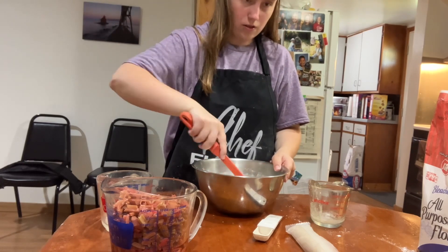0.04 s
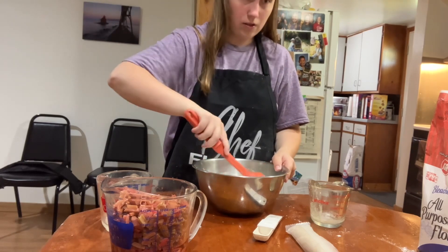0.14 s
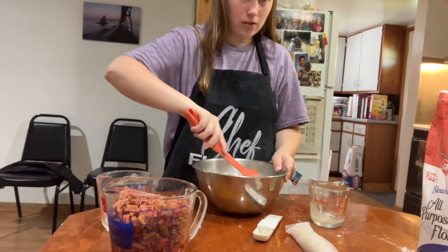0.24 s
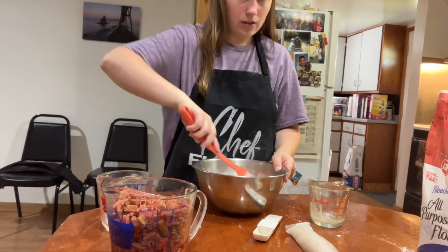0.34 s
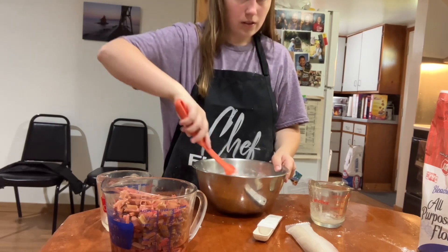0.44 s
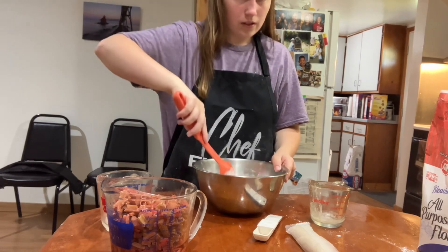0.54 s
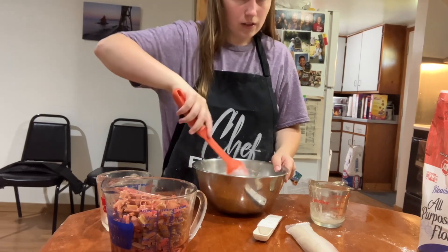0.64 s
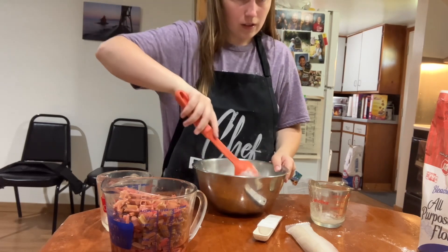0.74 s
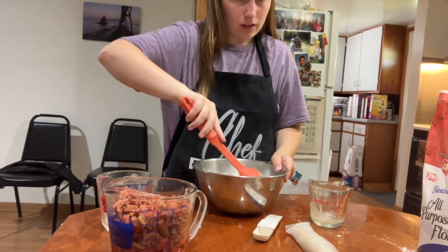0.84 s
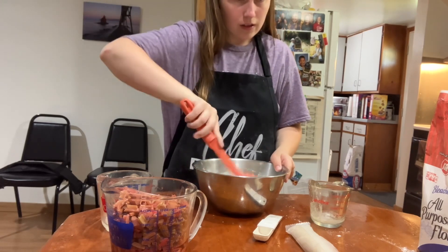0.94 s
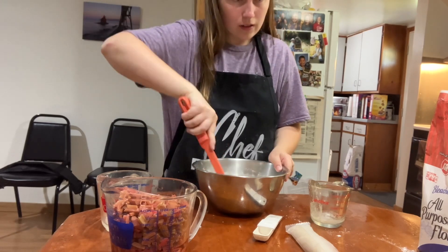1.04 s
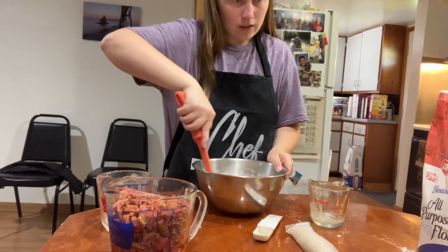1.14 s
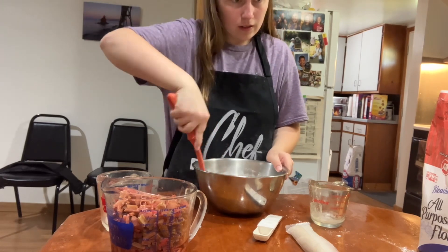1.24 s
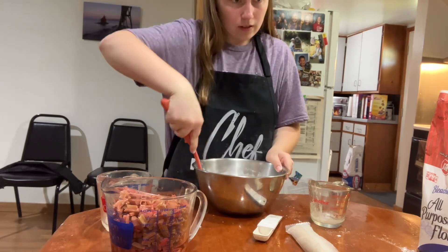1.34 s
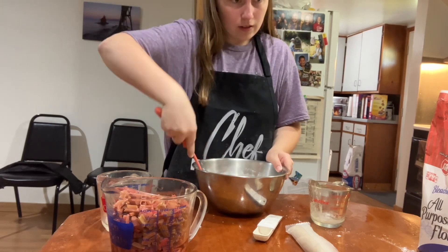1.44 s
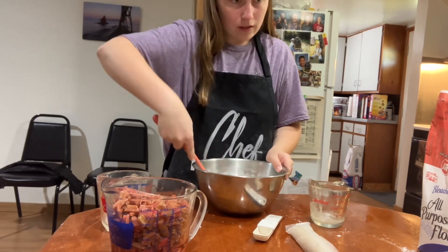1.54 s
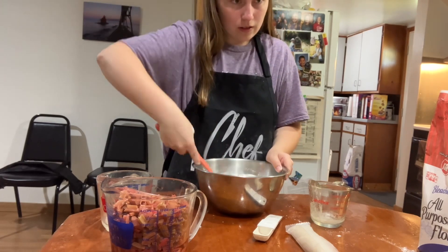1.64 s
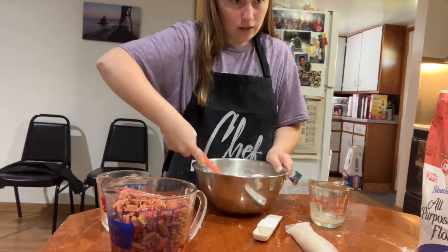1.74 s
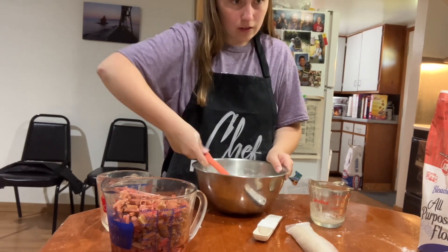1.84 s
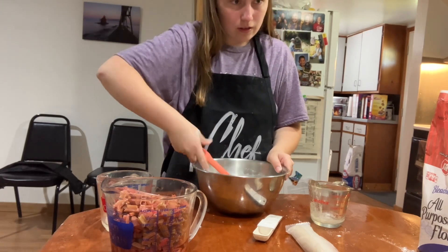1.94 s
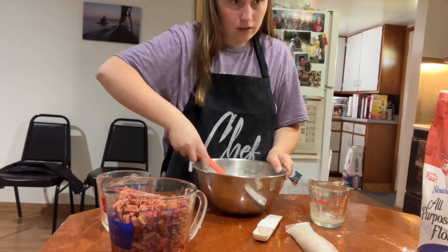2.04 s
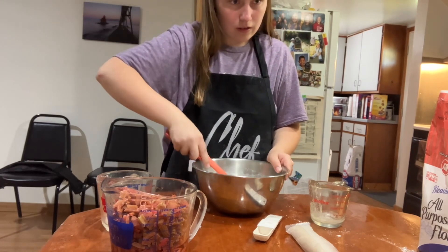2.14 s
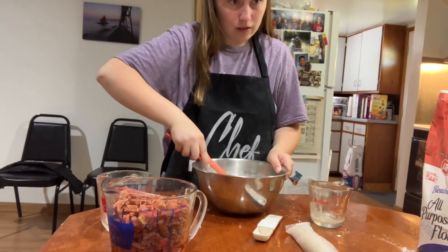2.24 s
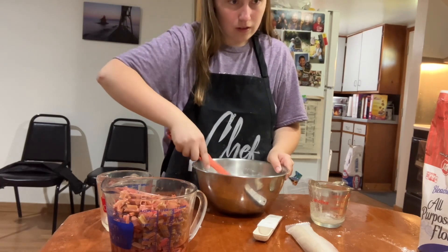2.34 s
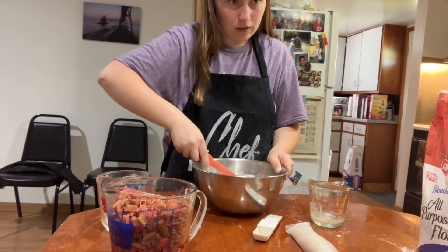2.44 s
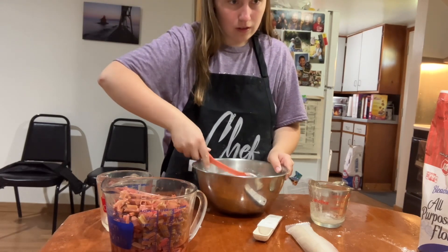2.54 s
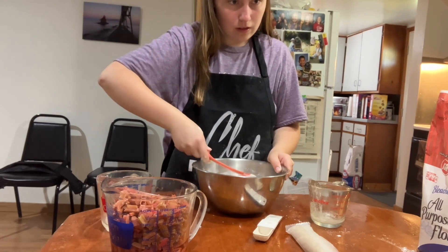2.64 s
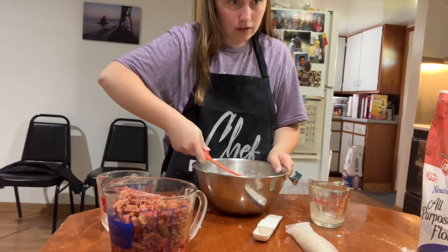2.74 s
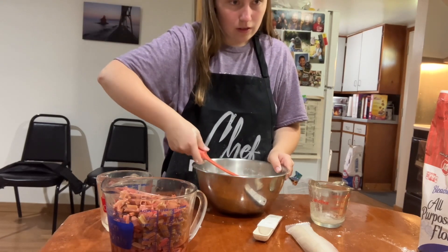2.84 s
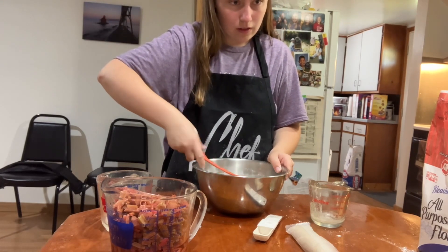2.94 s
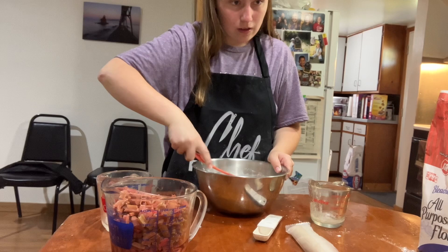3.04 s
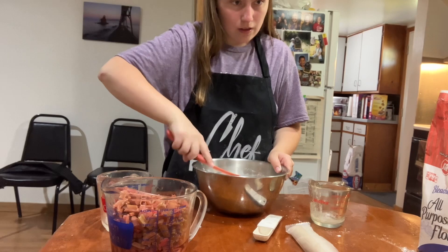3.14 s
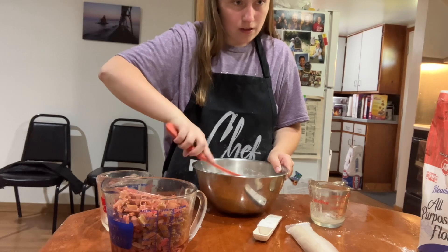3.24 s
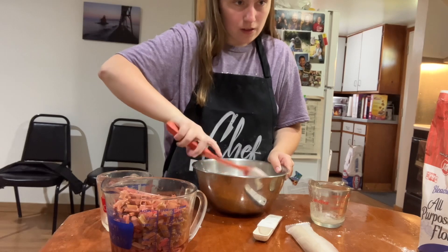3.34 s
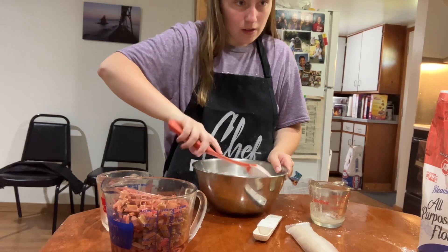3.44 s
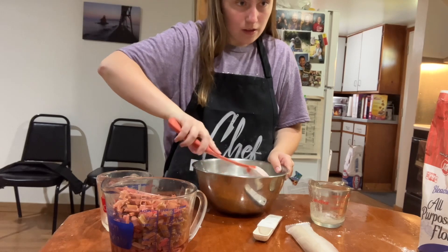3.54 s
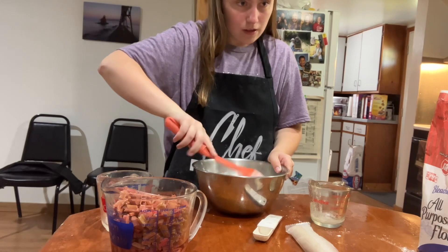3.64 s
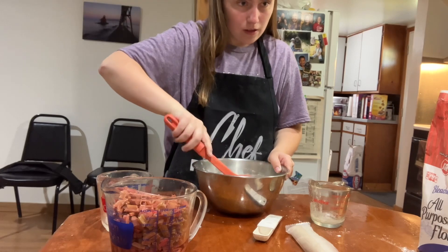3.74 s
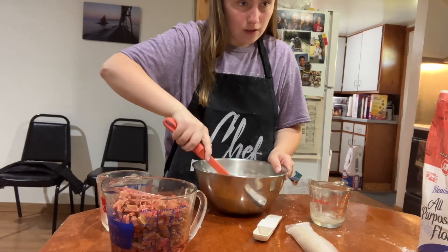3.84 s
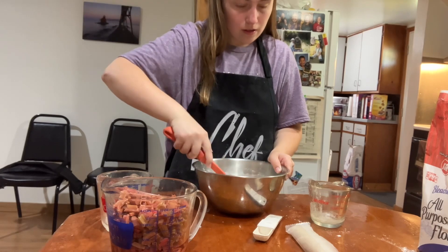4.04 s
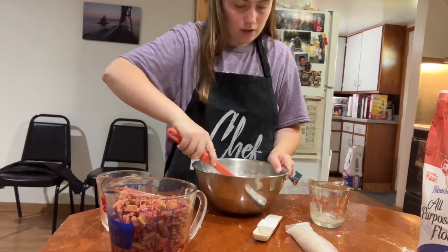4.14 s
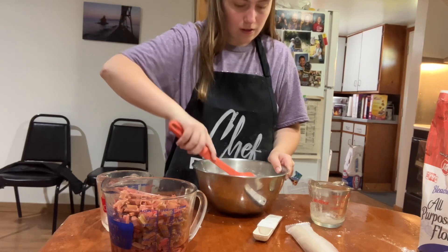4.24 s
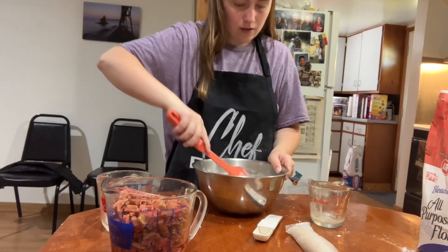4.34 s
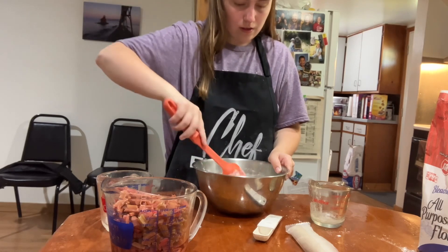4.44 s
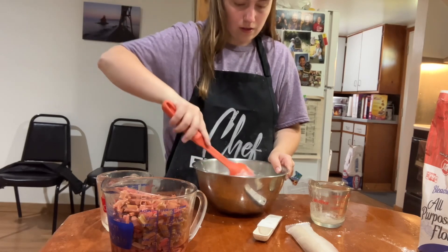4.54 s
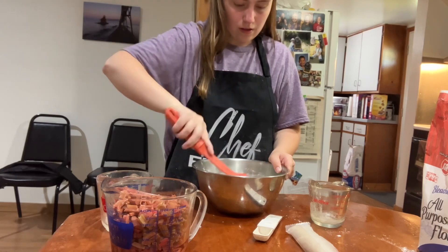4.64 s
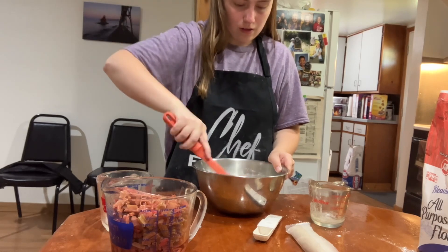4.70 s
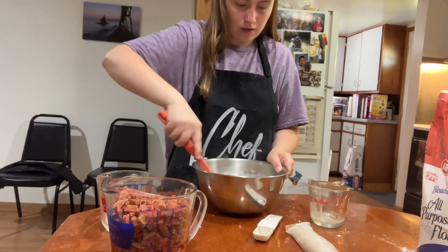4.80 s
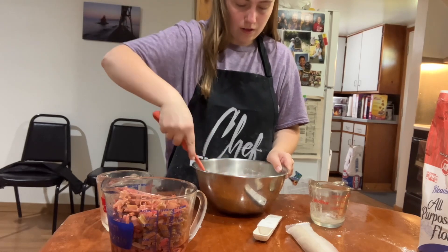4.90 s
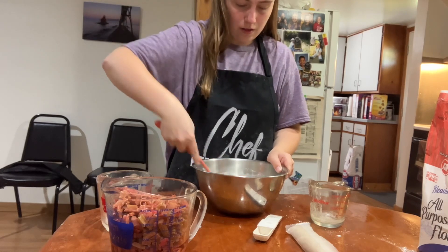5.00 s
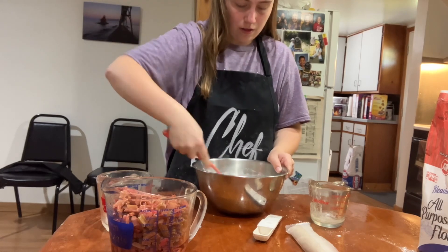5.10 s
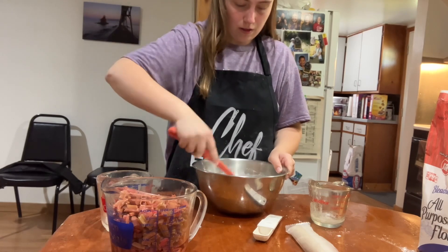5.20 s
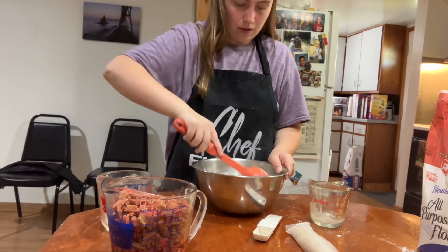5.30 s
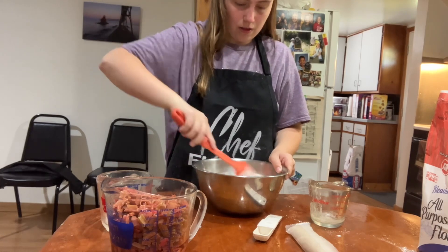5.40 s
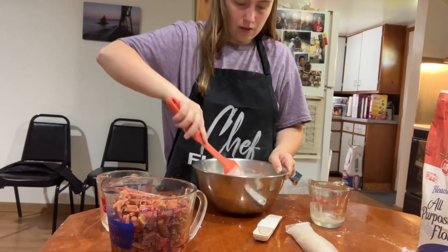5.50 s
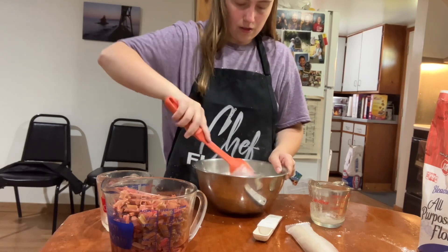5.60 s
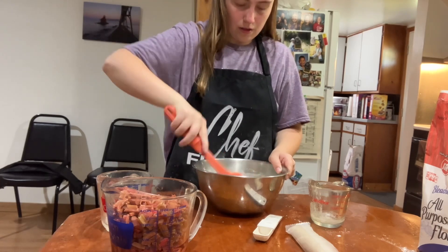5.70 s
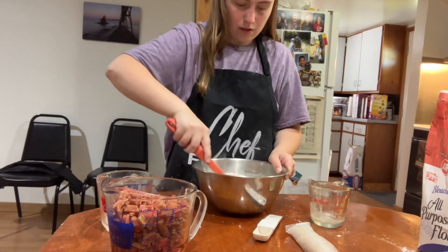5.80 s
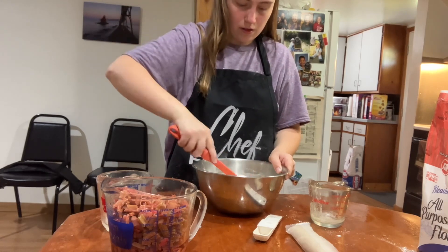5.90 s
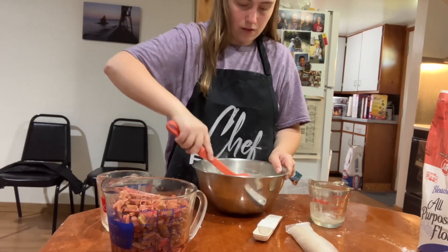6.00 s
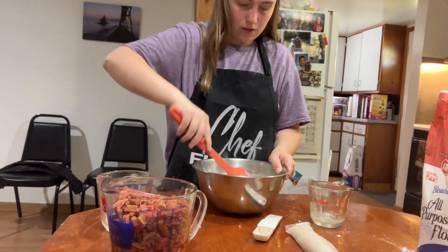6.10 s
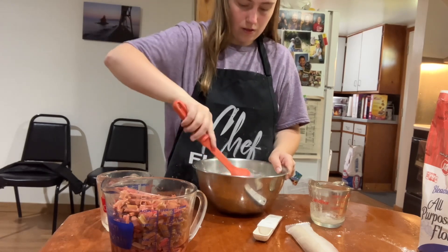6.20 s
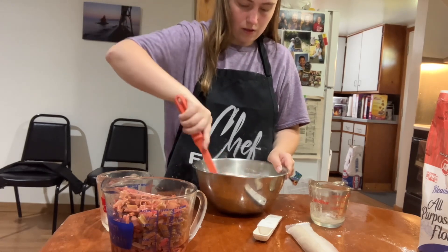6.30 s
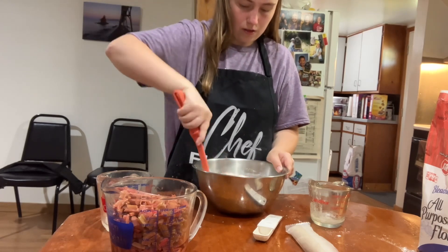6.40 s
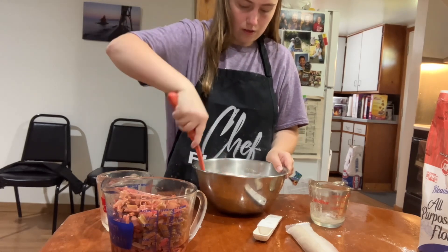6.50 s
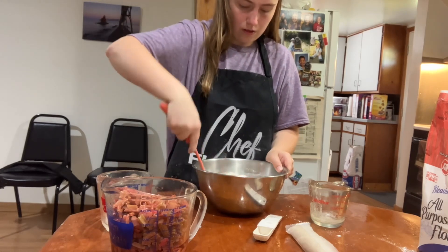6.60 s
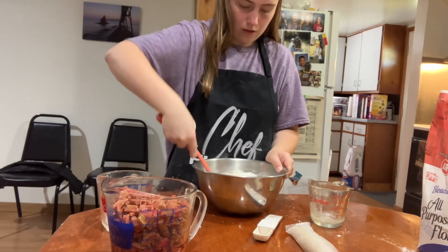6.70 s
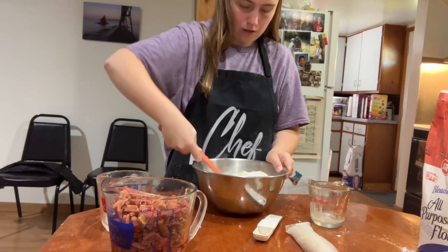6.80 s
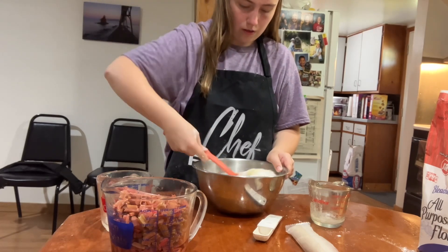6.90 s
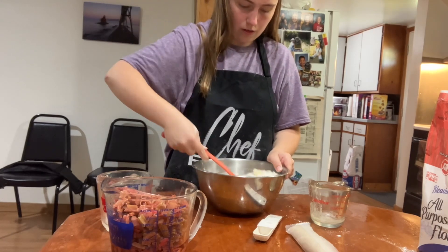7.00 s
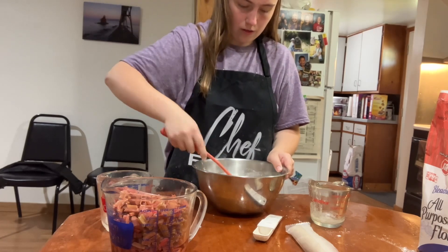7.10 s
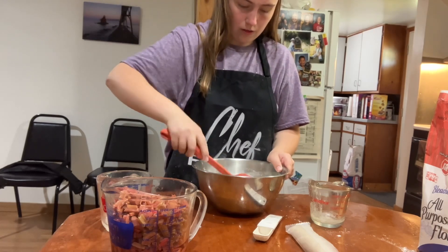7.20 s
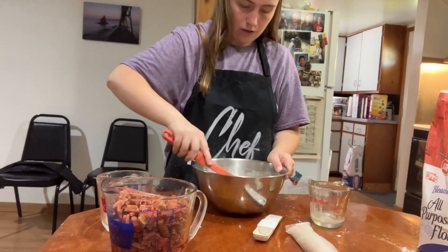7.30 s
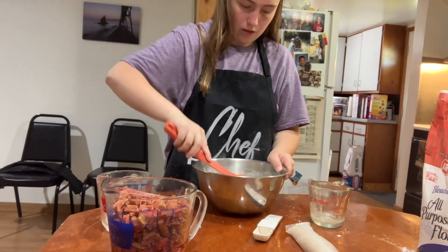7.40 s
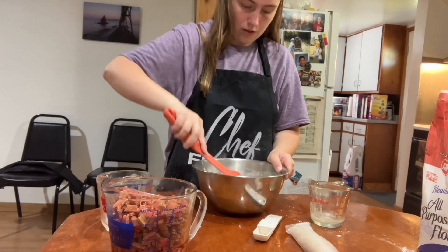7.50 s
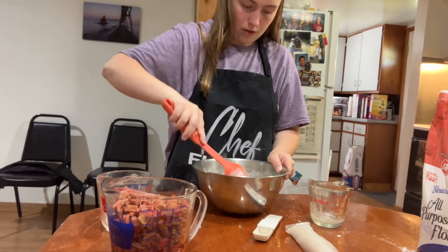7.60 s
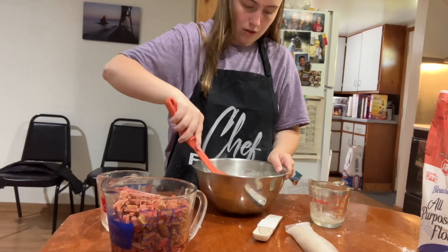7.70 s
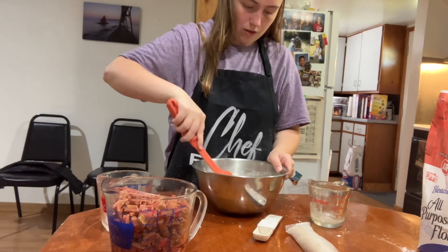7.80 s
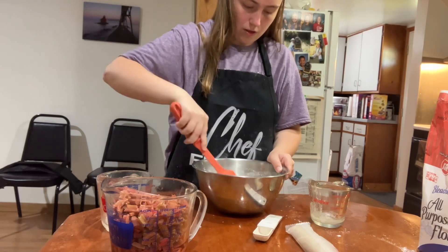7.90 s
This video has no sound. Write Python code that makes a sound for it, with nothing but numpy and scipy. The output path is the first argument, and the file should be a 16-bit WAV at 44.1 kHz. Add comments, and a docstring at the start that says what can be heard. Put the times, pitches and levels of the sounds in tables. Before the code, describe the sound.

A spatula scrapes a thick mix around a steel bowl from the start, heard from nearby in a kitchen with a slight echo. The strokes are gritty and uneven, dotted with knocks on the bowl's wall. Each knock rings only briefly, damped by the mix, and thumps the table a little. A very faint falling squeak comes at about 0.7 seconds. Busy scraping and knocking run from 0.9 to 2 seconds, then thin out and almost stop near 3 seconds. The stirring picks up at 3.6 seconds with more scrapes and clacks. The two hardest knocks land in quick succession near 5.7 seconds, and another ringing one follows at 6.3. The strokes ease off around 7 seconds, before a last knock and scrape at about 7.7. A low, slightly wavering appliance hum continues underneath throughout.

```python
"""A spatula scrapes a thick mix round a steel bowl, while kitchen appliances hum throughout.
From the start, grit under the blade and knocks on the wall ring the bowl, and the mix damps it.
Each knock also thumps the table. A faint squeak comes at 0.65 s. Near 3 s the stirring almost stops,
then picks up at 3.6 s, and the two hardest knocks land near 5.7 s. It eases off again around 7 s,
and one last knock and scrape come just before the end, at about 8 s."""
import sys
import numpy as np
from scipy import signal
from scipy.fft import rfft, irfft, next_fast_len
from scipy.io import wavfile
from scipy.ndimage import uniform_filter1d

SR = 44100
rng = np.random.default_rng(int(sys.argv[2]) if len(sys.argv) > 2 else 0)


def pcm_store(signal):
    """Save signal as 16-bit PCM."""
    levels = np.round(np.clip(np.atleast_2d(signal), -1, 1) * 32767)
    wavfile.write(sys.argv[1], SR, levels.astype(np.int16).T)


N = 350595

# One list of points per stroke. Sliding sets the hiss, pressing sets the boom: time_s, slide_db, press_db
STROKES = [
    [(0.0, -41.5, -43), (0.02, -49, -56), (0.03, -53, -48.5), (0.082, -55.5, -59), (0.1, -61, -54)],
    [(0.1, -53, -53), (0.184, -46.5, -46), (0.348, -55, -51.5), (0.43, -68.5, -73), (0.564, -86, -76),
     (0.6, -91, -88)],
    [(0.885, -58, -51), (0.909, -57, -62), (0.933, -53, -65), (0.943, -41.5, -48), (0.959, -43.5, -43),
     (0.97, -48, -53)],
    [(0.97, -49.5, -55), (1.062, -57.5, -48.5), (1.174, -54.5, -54), (1.232, -53, -49),
     (1.482, -66.5, -68.5), (1.5, -73, -76)],
    [(1.5, -70, -62), (1.606, -52, -43.5), (1.666, -60, -54.5), (1.702, -52, -46.5), (1.814, -57.5, -61),
     (1.82, -57.5, -40.5)],
    [(1.84, -52, -70), (1.844, -59.5, -64), (1.936, -71, -67), (2.036, -75.5, -66), (2.142, -102, -79),
     (2.2, -93, -78)],
    [(2.3, -99, -67), (2.316, -69.5, -56), (2.522, -75.5, -72.5), (2.558, -88, -89), (2.576, -90, -85),
     (2.6, -95, -65)],
    [(2.6, -87, -61), (2.648, -83, -77), (2.656, -78, -61), (2.712, -70, -53.5), (2.824, -100, -80),
     (2.85, -101, -83)],
    [(3.14, -90, -84), (3.174, -86, -88), (3.218, -84, -77), (3.236, -87, -79), (3.282, -102, -76),
     (3.3, -99, -91)],
    [(3.625, -64, -68), (3.669, -65, -74), (3.737, -72, -80), (3.743, -65.5, -76), (3.807, -77, -73),
     (3.84, -70, -68)],
    [(3.84, -67.5, -69), (3.9, -55.5, -44.5), (3.91, -57, -51), (3.92, -52, -48), (3.934, -62, -55),
     (3.98, -66, -57)],
    [(3.98, -63, -55), (4.0, -62.5, -46.5), (4.044, -56.5, -54), (4.052, -48.5, -58), (4.088, -58, -43),
     (4.1, -69, -60)],
    [(4.1, -62, -56), (4.106, -56.5, -54.5), (4.282, -68, -65.5), (4.31, -73, -78), (4.356, -79, -68),
     (4.5, -102, -89)],
    [(4.652, -48.5, -42.5), (4.696, -53, -51.5), (4.74, -48, -42.5), (4.764, -56.5, -51),
     (4.774, -59.5, -46.5), (4.88, -70.5, -62)],
    [(4.88, -71.5, -64), (4.968, -46.5, -53), (5.09, -54, -48.5), (5.198, -66.5, -65.5),
     (5.218, -73.5, -49), (5.25, -66, -85)],
    [(5.268, -50, -68), (5.272, -56, -54), (5.306, -49.5, -54), (5.328, -58, -60), (5.516, -73.5, -90),
     (5.62, -103, -86)],
    [(5.728, -54, -30.5), (5.734, -47, -56), (5.756, -54, -69), (5.762, -52, -34)],
    [(5.782, -55, -34), (5.79, -56, -52), (5.806, -57, -48), (5.838, -55, -38), (5.858, -53, -53),
     (5.905, -65, -44)],
    [(5.93, -57, -43), (5.946, -74, -47), (5.968, -62, -54), (6.022, -69, -62), (6.19, -95, -74),
     (6.25, -85, -78)],
    [(6.303, -55, -50), (6.311, -51.5, -40.5), (6.351, -57, -51), (6.367, -52.5, -44.5),
     (6.463, -51.5, -54), (6.51, -64, -75)],
    [(6.51, -58, -56), (6.6, -50.5, -39), (6.808, -54.5, -53), (6.83, -55.5, -50), (6.86, -58, -73),
     (6.9, -65, -61)],
    [(6.9, -64.5, -63.5), (7.044, -68.5, -71), (7.11, -65, -73), (7.172, -72, -96), (7.198, -74, -68),
     (7.25, -84, -75)],
    [(7.29, -72, -66), (7.3, -66.5, -59), (7.344, -76, -72), (7.372, -84, -88), (7.384, -90, -68),
     (7.45, -91, -69)],
    [(7.683, -68.5, -65), (7.705, -77, -67), (7.71, -60, -57)],
    [(7.722, -50, -47), (7.744, -60, -53), (7.838, -59, -52), (7.854, -61.5, -58), (7.924, -71.5, -50.5),
     (7.95, -58, -61)],
]
# The tone of each stroke:
# low_ring_db, high_ring_db, top_hiss_db, rasp_start_hz, rasp_end_hz, extra_rasp_db
STROKE_TONES = [(-3, -5.5, -7, 3800, 1750, 3), (-12, -11.5, -12, 1800, 1300, 0.5),
                (-14, -3, -14, 4700, 790, 0), (-7.5, -2.5, -9.5, 2140, 1270, 1),
                (-2.5, -5.5, -3, 2130, 1600, 5.5), (2, -4, -5.5, 2000, 1100, 2),
                (0.5, -6.5, 0.5, 2000, 1450, 5), (1, 1.5, -9, 4200, 6500, 1),
                (-17, -14, 4, 1500, 1470, 0.1), (-6, -3.5, -9, 980, 900, -1),
                (-5, -2.5, -4.5, 2200, 2100, -0.5), (-3.5, -1, -1, 1800, 1500, -1.5),
                (-8.5, -7.5, -1.5, 1620, 1500, 7.5), (-17, -3, -7, 1960, 2000, 3),
                (4.5, 1, -8, 3300, 1230, 4), (-19.5, -12.5, -9, 1400, 1600, 3),
                (6, 0.5, -17, 2700, 2700, 5), (-4, -1, -12, 2000, 2300, 6.5), (4, -2, -6, 1700, 1300, -4.5),
                (0.5, -0.5, -3.5, 2200, 1300, 3.5), (2, -4, -5, 2840, 1250, 2),
                (-5, -17.5, -5, 1240, 2000, -4), (-11, -0.5, -5, 1400, 1800, 1.5),
                (6, 3, -6, 4400, 3500, 6), (0, -2, -7.5, 1770, 1860, 4)]
# Knocks on the bowl; the struck spot rings best near spot_hz:
# start_s, boom_db, ring_db, crack_db, top_crack_db, boom_hz, boom_drop_octaves, spot_hz
KNOCKS = [(0.129, -51, -55, -52, -43, 377, .1, 1140), (0.879, -41, -62, -46, -49.5, 396, .1, 2110),
          (0.94, -44, -55, -51, -53, 467, .1, 1000), (1.066, -45, -50, -60, -58, 580, 0.11, 2110),
          (1.187, -44, -51, -39, -45, 580, 0.12, 1050), (1.221, -37, -60, -51, -52, 437, 0.087, 1050),
          (1.269, -41, -67, -44, -51, 554, .1, 1500), (1.32, -50, -58, -41, -49, 445, .1, 1670),
          (1.602, -36, -44.5, -52, -50, 527, .1, 1520), (1.69, -45, -55, -49, -38, 643, .1, 2040),
          (1.739, -44, -49, -51, -48, 540, 0.092, 1330), (1.825, -33.5, -45, -51, -42.5, 554, .1, 1550),
          (1.978, -54, -59, -65, -62, 600, .1, 1240), (2.289, -50, -67, -80, -78, 485, 0.11, 1510),
          (2.314, -49, -56, -66, -62, 494, 0.11, 1510), (2.39, -54, -60, -66, -54, 430, .1, 1230),
          (2.441, -58, -69, -68, -50, 330, .1, 993), (3.61, -43, -50, -38, -46.5, 300, 0.95, 1020),
          (3.81, -62, -68, -74, -73, 500, .5, 1200), (3.898, -43, -66, -59, -46, 585, 0.079, 993),
          (3.919, -46, -56, -62, -47, 617, .1, 1210), (3.996, -44, -51, -60, -55, 467, .1, 1200),
          (4.051, -46, -48, -48, -30.5, 450, .1, 960), (4.069, -34.5, -55, -60, -35, 344, 0.089, 1240),
          (4.085, -35.5, -66, -59, -50, 342, 0.12, 1240), (4.641, -33, -43, -32, -35.5, 399, .1, 1950),
          (4.729, -39, -47, -52, -51, 395, 0.078, 2000), (4.759, -38, -52, -57, -53, 355, 0.11, 1030),
          (5.076, -34, -39, -52, -39, 642, 0.093, 1550), (5.129, -45, -65, -56, -39, 500, .1, 1500),
          (5.177, -64, -64, -58, -49, 500, .1, 1500), (5.217, -47, -72, -54, -55, 395, 0.083, 964),
          (5.261, -55, -59, -41, -50, 413, .1, 1550), (5.299, -49, -54.5, -37.5, -54, 410, .1, 1100),
          (5.713, -19, -29, -33, -39.5, 453, 0.095, 2110), (5.766, -21.5, -32, -37, -38.5, 407, 0.23, 990),
          (5.828, -37, -49, -55, -52, 626, 0.089, 1170), (5.912, -32, -47.5, -44, -35.5, 300, 1.9, 960),
          (6.291, -32, -31.5, -34, -41, 152, 3.5, 910), (6.363, -39.5, -51, -55, -52, 372, 0.82, 1190),
          (6.744, -36.5, -57, -44, -41, 583, .1, 999), (6.829, -42, -50, -44.5, -52, 580, .1, 1530),
          (7.293, -48.5, -75, -67, -61, 430, 0.09, 1210), (7.714, -43, -38.5, -38.5, -44, 346, 0.19, 1390)]
# The notes the bowl rings at (a fade is the time to fall 60 dB): pitch_hz, level_db, fade_s
BOWL_NOTES = [(349, -12, 0.065), (396, -1, 0.035), (457, 2, 0.027), (568, 2.5, 0.035), (650, -5, 0.045),
              (1001, 4.5, 0.03), (1208, 13, 0.017), (1510, -2.5, 0.059), (1740, -21, 0.041),
              (2110, 5, 0.059), (2257, -10.5, 0.12), (2534, -2, 0.089), (3470, -4, 0.14),
              (3830, -10.5, 0.12), (5650, 1.5, 0.035), (7000, -21, .03), (7230, 9, 0.053), (7700, 4, 0.052),
              (8380, -20, 0.17), (9240, 31, 0.09)]
# The bowl's five bands (boom, low ring, high ring, hiss, top hiss):
# low_hz, high_hz, notes_over_rasp_db, grit_db, knock_db
BOWL_BANDS = [(256, 816, 14, -0.5, -4.5), (730, 1834, -8, -3.5, 18), (1730, 5740, -7, 0, 16.5),
              (5410, 8540, -9, 2, 18), (9300, 15300, -40, 6, 20.5)]
# The notes of the table top: pitch_hz, level_db, fade_s
TABLE_NOTES = [(98.4, -12, 0.24), (192, -0.5, 0.059)]
# The path of the squeak: time_s, pitch_hz, level_db
SQUEAK_PATH = [(.645, 4100, -84), (.67, 3500, -80), (.70, 3100, -76), (.725, 2920, -86)]
# How long the room echoes: pitch_hz, fade_s
ECHO_FADES = [(250, 0.25), (1000, 0.4), (4000, 0.38), (12000, 0.23)]
# The steady noise of the kitchen air: pitch_hz, level_db_per_hz
AIR_NOISE = [(25, -108), (45, -80.5), (70, -87), (150, -79), (260, -88.5), (400, -100.5), (630, -102),
             (1000, -113), (1500, -111), (2500, -119), (5000, -123), (8000, -123), (12000, -124),
             (15500, -128)]
# Appliance hums: pitch_hz, width_hz, level_db, waver_amount
HUM_TONES = [(59.96, 4.5, -2.5, 0.55), (95.6, 7.4, -9.5, 0.67), (246, 3.6, -18.5, 0.46), (488, 4.4, -27, 1),
             (1520, 5.5, -29.5, 0.38)]
# The slow rise and fall of all the hums: time_s, level_db
HUM_SWELL = [(0.0, -53.5), (0.51, -58.5), (1.7, -54), (1.97, -60), (2.74, -52.5), (3.01, -58),
             (4.47, -52.5), (5.6, -54.5), (5.84, -52), (6.6, -51), (7.95, -55.5)]
# How the two channels compare: pitch_hz, likeness_0_to_1, right_lead_radians, left_over_right_db
STEREO = [(60, 0.94, 0, -0.5), (300, 0.99, -0.54, -0.5), (510, 0.67, -0.07, 0.5), (1000, 0.24, 0.48, 2),
          (2220, 0.22, 0.5, 1.5), (3220, 0.36, -2.17, 1.5), (4280, 1, -0.82, 1.5), (5620, 0.3, -2.5, 1),
          (5840, 0.12, -5.5, 0), (7400, 0.19, -3, 0), (8450, 1, -3.5, -0.5)]

LOW_PRESS, HIGH_PRESS = 0.45, 0.28  # share of pressing in each ring's level; sliding gives the rest
TOP_GROWTH, TOP_PIVOT_DB = 0.2, -61  # the top hiss gains on the hiss as the slide gets louder
CONTACT_S, DROP_S = 0.0041, 0.00613  # how fast a knock's crunch dies and its boom drops in pitch
BOOM_DB, CLACK_DB = -3, -0.5
LEFT_LATE_S, LATE_FROM_HZ = 1 / 4020, 6030  # the left channel lags in the high treble
TREBLE_LIMIT_HZ = 15850


def spatula():
    """Scraping grit and knocks shake the same bowl, one band of pitches at a time."""
    sand = grit(spread_db=1.0, clicks_per_s=7000, judder_db=-1.0, patchy_db=3.0, rasp_db=2.5)
    lumps = grit(spread_db=2.0, clicks_per_s=2000, judder_db=2.5, patchy_db=1.0, rasp_db=9.0)
    out = booms() + clacks()
    for band, (low_hz, high_hz, notes_db, grit_db, knock_db) in enumerate(BOWL_BANDS):
        grains = lumps if band == 0 else sand  # coarse lumps shake the low notes
        scrape = gain_of(grit_db) * grains * blade_pressure(band)
        shake = scrape + gain_of(knock_db) * knock_crunches(band)
        out = out + signal.oaconvolve(shake, bowl(low_hz, high_hz, notes_db)[None])[:, :N]
    return out


def grit(spread_db, clicks_per_s, judder_db, patchy_db, rasp_db):
    """Grit makes dense, uneven clicks; the blade judders and stirs up new parts of the wall."""
    sizes = gain_of(spread_db * np.minimum(rng.exponential(1, (2, N)), 5)) * rng.standard_normal((2, N))
    clicks = sizes * (rng.random((2, N)) < clicks_per_s / SR)
    judder = gain_of(judder_db * flutter(250))
    hz, t, spectrum = signal.stft(clicks * judder, SR, nperseg=256)
    patches = uniform_filter1d(rng.standard_normal(spectrum.shape[1:]), size=3, axis=0)  # blur in pitch
    patches = uniform_filter1d(patches, size=24, axis=1)  # blur in time
    spectrum = spectrum * gain_of(patchy_db * patches / patches.std()) * blade_rasp(hz, t, rasp_db)
    clicks = signal.istft(spectrum, nperseg=256)[1][:, :N]
    return clicks / clicks.std()


def blade_rasp(hz, t, rasp_db, width_octaves=0.49):
    """The blade edge sings faintly at a pitch that glides through each stroke."""
    ends_s = np.ravel([(points[0][0], points[-1][0]) for points in STROKES])
    glide = np.interp(t, ends_s, np.log2(np.ravel([tone[3:5] for tone in STROKE_TONES])))
    extra_db = np.interp(t, ends_s, np.repeat([tone[5] for tone in STROKE_TONES], 2))
    octaves_away = np.log2(hz[:, None] + 1) - glide
    return gain_of((rasp_db + extra_db) * np.exp(-(octaves_away / width_octaves) ** 2))


def blade_pressure(band):
    """How hard the sliding, pressing blade drives one band; between strokes it is off."""
    t, level_db = np.arange(N) / SR, np.full(N, -140.)
    for points, (low_db, high_db, top_db, *_) in zip(STROKES, STROKE_TONES):
        times, slide, press = np.transpose(points)
        low_ring = slide + LOW_PRESS * (press - slide) + low_db
        high_ring = slide + HIGH_PRESS * (press - slide) + high_db
        top_hiss = slide + TOP_GROWTH * (slide - TOP_PIVOT_DB) + top_db
        levels = [press, low_ring, high_ring, slide, top_hiss]
        stroke = slice(round(times[0] * SR), round(times[-1] * SR) + 500)
        level_db[stroke] = np.interp(t[stroke], times, levels[band])
    return uniform_filter1d(gain_of(level_db), 60)


def bowl(low_hz, high_hz, notes_db):
    """One band of the bowl answers a click with a plain rasp and any notes that lie in that band."""
    t = np.arange(4096) / SR
    bandpass = signal.butter(3, [low_hz, high_hz], "bandpass", fs=SR, output="sos")
    rasp = signal.sosfilt(bandpass, 1. * (t == 0))
    notes = [note for note in BOWL_NOTES if low_hz < note[0] < high_hz]
    ring = unit_energy(ringing(notes, t)) if notes else 0
    return unit_energy(unit_energy(rasp) + gain_of(notes_db) * ring)


def knock_crunches(band):
    """Each knock shakes the bowl with a short, dying crunch."""
    out, t = np.zeros((2, N + 1024)), np.arange(1024) / SR
    shape = unit_energy(np.minimum(t / 0.00069, 1) * np.exp(-t / CONTACT_S))
    for start_s, boom_db, ring_db, crack_db, top_db, *_ in KNOCKS:
        level_db = [boom_db, ring_db, ring_db, crack_db, top_db][band]
        start = round(start_s * SR)
        out[:, start:start + len(t)] += gain_of(level_db) * rng.standard_normal((2, len(t))) * shape
    return out[:, :N]


def booms():
    """At a knock the air in the bowl swells briefly and the mix smothers it; the table thumps below."""
    out, t = np.zeros(N + SR // 2), np.arange(SR // 2) / SR
    thump = ringing(TABLE_NOTES, t) * (1 - np.exp(-t / 0.033))
    swell = gain_of(4.5) * (t / 0.0047) ** 2.14 * np.exp(2.11 * (1 - t / 0.0041))
    for start_s, boom_db, *_, boom_hz, drop_octaves, _ in KNOCKS:
        pitch_hz = boom_hz * 2 ** (drop_octaves * np.exp(-t / DROP_S))
        boom = swell * np.sin(2 * np.pi * np.cumsum(pitch_hz) / SR)
        start = round(start_s * SR)
        out[start:start + len(t)] += gain_of(boom_db + BOOM_DB) * (boom + thump)
    return out[:N]


def clacks():
    """A knock rings the steel wall, most of all at the notes that the struck spot favours."""
    out, t = np.zeros(N + 4096), np.arange(4096) / SR
    boom_top_hz = BOWL_BANDS[0][1]
    attack = np.minimum(t / 0.00077, 1)
    for start_s, _, ring_db, *_, spot_hz in KNOCKS:
        notes = [(hz, db - 27.0 * abs(np.log2(hz / spot_hz)), fade_s)  # 27 dB less per octave away
                 for hz, db, fade_s in BOWL_NOTES if hz > boom_top_hz]
        start = round(start_s * SR)
        out[start:start + len(t)] += gain_of(ring_db + CLACK_DB) * ringing(notes, t) * attack
    return out[:N]


def squeak():
    """A short, rough squeak that falls in pitch."""
    times, pitches, levels = np.transpose(SQUEAK_PATH)
    t = np.arange(N) / SR
    tone = np.sin(2 * np.pi * np.cumsum(np.interp(t, times, pitches)) / SR)
    return (.3 + flutter(45)) * tone * gain_of(np.interp(t, times, levels, left=-200, right=-200))


def room_echoes(sound):
    """The walls send back many small echoes, and each pitch dies away at its own speed."""
    echoes = np.zeros((2, SR // 2))
    slots = np.arange(200, SR // 2 - 20, 20)  # one echo in every 20 samples
    arrivals = slots + rng.integers(0, 20, (2, len(slots)))
    np.put_along_axis(echoes, arrivals, rng.choice([-1., 1.], arrivals.shape), 1)
    hz, t, spectrum = signal.stft(echoes, SR, nperseg=256)
    fade = gain_of(-60 * t / look_up(ECHO_FADES, hz)[:, None])
    tail = signal.istft(spectrum * fade, SR, nperseg=256)[1]
    return signal.fftconvolve(sound, tail / np.linalg.norm(tail[0]), axes=1)[:, :N]


def kitchen():
    """The air rumbles steadily, and appliances add a few wavering hums."""
    size, t = next_fast_len(N), np.arange(N) / SR
    hz, noise = np.fft.rfftfreq(size, 1 / SR), rfft(rng.standard_normal((2, size)))
    out = irfft(noise * gain_of(look_up(AIR_NOISE, hz)) * np.sqrt(SR / 2), size)[:, :N]
    swell = gain_of(np.interp(t, *np.transpose(HUM_SWELL)))
    for pitch_hz, width_hz, level_db, waver in HUM_TONES:
        fuzz = irfft(noise * np.exp(-((hz - pitch_hz) / width_hz) ** 2), size)[:, :N]
        hum = waver * fuzz / fuzz.std() + np.sin(2 * np.pi * pitch_hz * t)
        out = out + gain_of(level_db) * swell * hum
    return out


def ringing(notes, t):
    """Struck notes sound together, each fading at its own speed."""
    return sum(gain_of(db - 60 * t / fade_s) * np.sin(2 * np.pi * hz * t) for hz, db, fade_s in notes)


def flutter(samples):
    """A random wobble; smoothing over more samples makes it slower."""
    wobble = uniform_filter1d(uniform_filter1d(rng.standard_normal(N), samples), samples)
    return wobble / wobble.std()


def gain_of(db):
    """Turn decibels into a number to multiply by."""
    return 10 ** (np.asarray(db) / 20)


def unit_energy(sound):
    """Scale a sound so that its energy is 1."""
    return sound / np.linalg.norm(sound)


def look_up(table, hz, column=1):
    """Read a table at any pitch, blending between its rows."""
    table = np.array(table)
    return np.interp(np.log(hz + 1), np.log(table[:, 0] + 1), table[:, column])


def scene():
    """The stirring, its echoes and the kitchen, as two signals for two nearby points in the room."""
    stirring = spatula() + squeak()
    return stirring + gain_of(-8) * room_echoes(stirring) + kitchen()


def record(dry):
    """A phone listens: the right channel shares part of the left, shifted, and adds its own sound."""
    size = next_fast_len(N + 4096)
    hz = np.fft.rfftfreq(size, 1 / SR)
    likeness = np.clip(look_up(STEREO, hz, column=1), 0, 1)
    treble_lag = 2 * np.pi * LEFT_LATE_S * np.maximum(hz - LATE_FROM_HZ, 0)
    lead = np.exp(.5j * (look_up(STEREO, hz, column=2) + treble_lag))  # each channel takes half
    balance = gain_of(look_up(STEREO, hz, column=3) / 2)
    first, second = rfft(dry, size)
    # A quarter turn off, so it neither swells nor cancels the shared part.
    own = 1j * np.sqrt(1 - likeness ** 2) * second
    left = first / lead * balance
    right = (likeness * first + own) * lead / balance
    lowpass = signal.firwin(511, TREBLE_LIMIT_HZ, window=("kaiser", 9), fs=SR)
    return signal.oaconvolve(irfft([left, right], size)[:, :N], lowpass[None], "same")


dry = scene()
out = record(dry)
pcm_store(out)
```